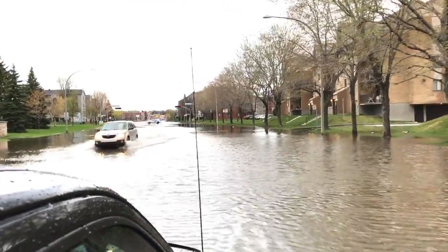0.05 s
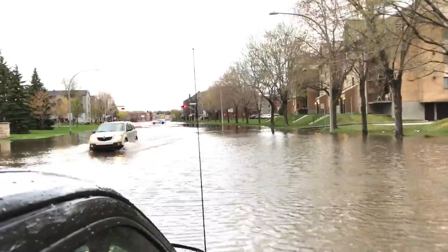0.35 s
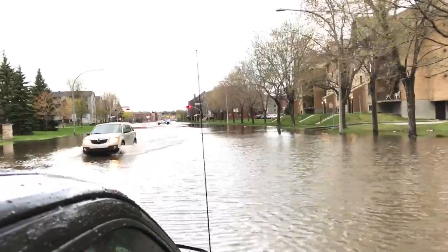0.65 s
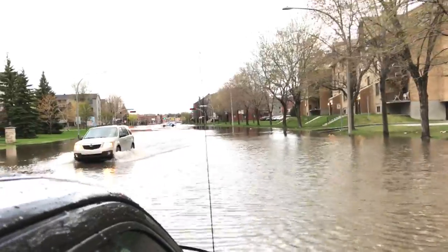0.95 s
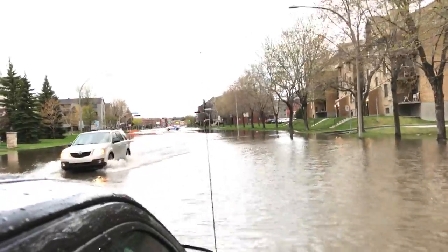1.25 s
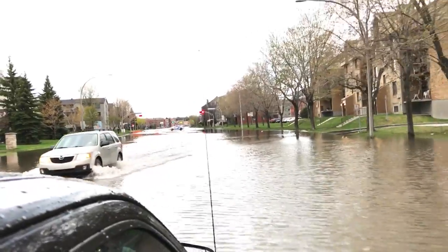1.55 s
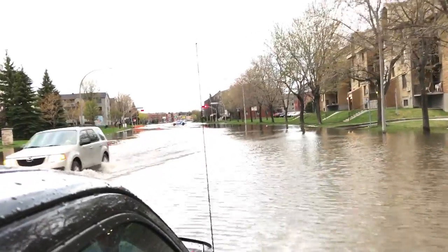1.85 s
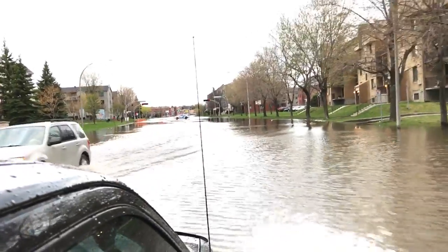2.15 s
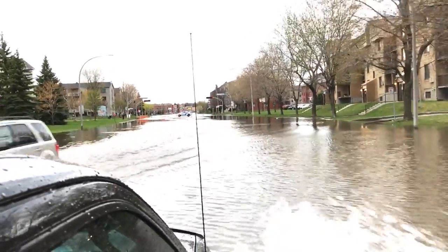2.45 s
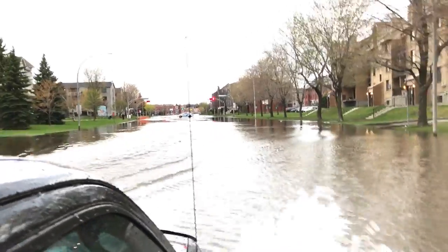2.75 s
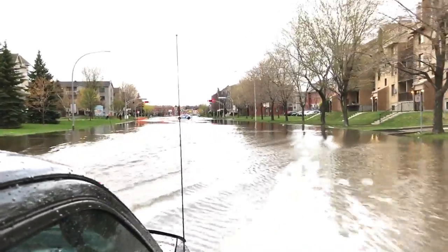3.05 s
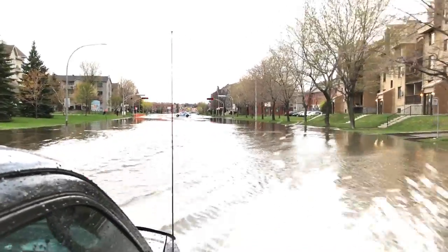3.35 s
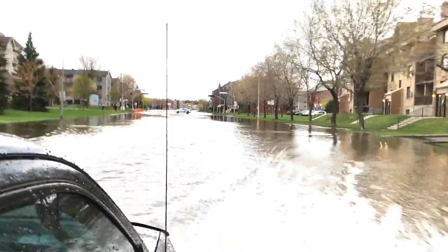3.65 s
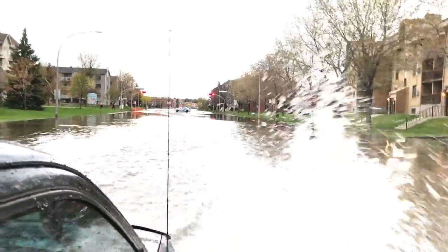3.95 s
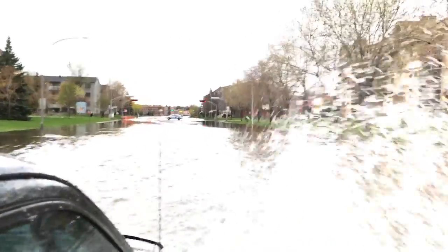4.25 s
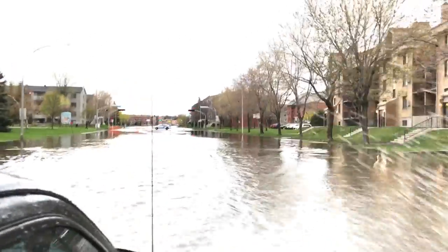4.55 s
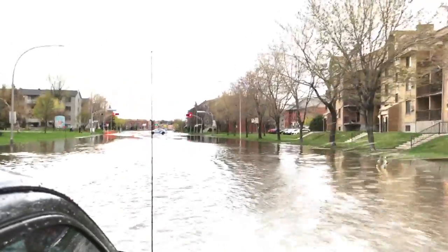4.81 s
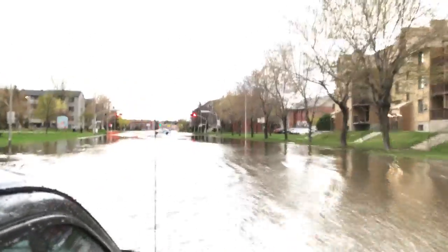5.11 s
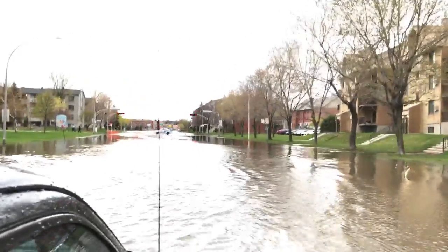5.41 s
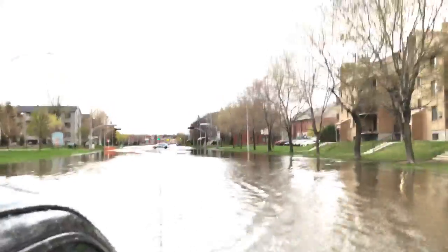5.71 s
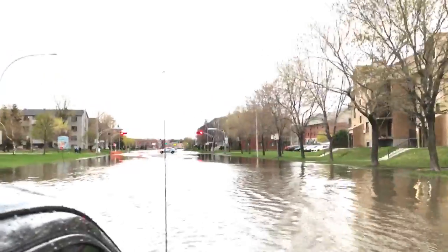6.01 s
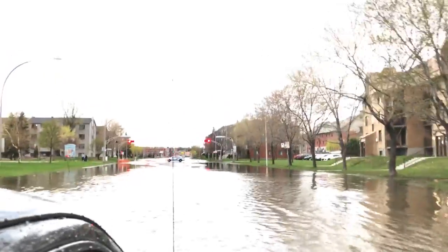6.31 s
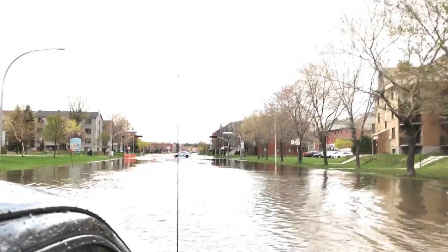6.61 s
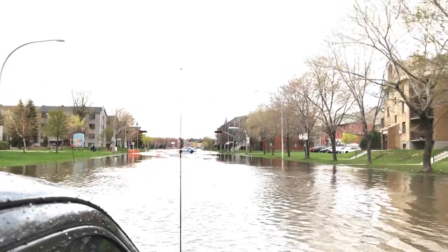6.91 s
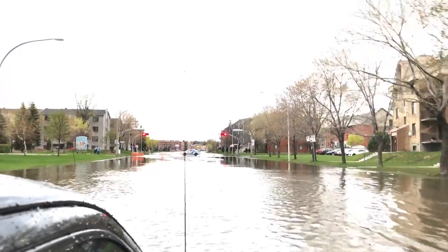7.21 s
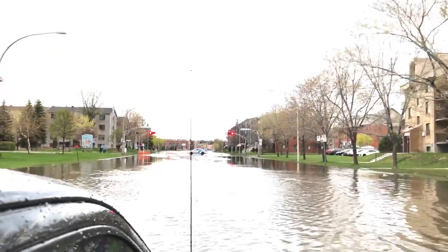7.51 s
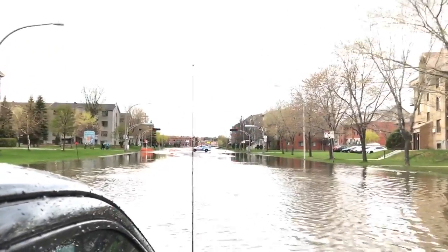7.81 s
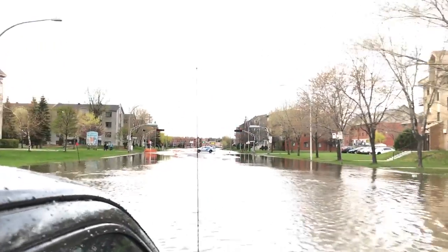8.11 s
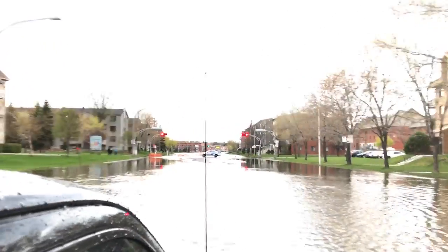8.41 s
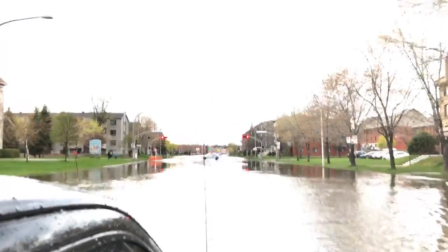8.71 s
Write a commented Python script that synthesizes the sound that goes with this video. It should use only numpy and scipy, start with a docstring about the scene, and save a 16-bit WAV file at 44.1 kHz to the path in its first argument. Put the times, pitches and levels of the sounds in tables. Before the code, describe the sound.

Water sloshes and hisses from wheels wading through a flooded street, with a passing car's low engine and gusty wind thumps.

```python
"""Wading through a flooded street

Heard from a camera held out of a vehicle's window. Close by, the bow wave churns, rushes with
bubbles and throws spray; drops plink into the water and knock on the case. Farther off, an oncoming
car revs low as it ploughs past. Wind rumbles and flaps right on the microphone, and its sharpest
eddies pop against it."""
import sys
import numpy as np
from scipy import signal
from scipy.fft import rfft, irfft, next_fast_len
from scipy.io import wavfile
from scipy.ndimage import uniform_filter1d, minimum_filter1d

SR = 44100
rng = np.random.default_rng(int(sys.argv[2]) if len(sys.argv) > 2 else 0)


def generate_wav(signal):
    """Clip the signal to [-1, 1] and save it as 16-bit WAV at the path in sys.argv[1]."""
    frames = np.transpose(np.atleast_2d(signal))
    scaled = np.clip(frames, -1, 1) * 32767
    pcm = np.round(scaled).astype(np.int16)
    wavfile.write(sys.argv[1], SR, pcm)


N = 395136
TIME = np.arange(N) / SR


# Water thrown aside by the wheels below the window, stronger once the vehicle gathers speed:
# (time [s], rush level [dB], spray level [dB])
BOW_WAVE_LEVELS = [(0, -30.5, -39), (.35, -32, -39.5), (.55, -34.5, -41), (1, -31.5, -40.5),
                   (1.45, -31.5, -40.5), (1.97, -32.5, -38.5), (2.17, -25, -33), (2.8, -26, -31.5),
                   (4.06, -25, -31), (4.6, -29.5, -33), (5.15, -31.5, -34.5), (5.4, -29.5, -37.5),
                   (5.8, -26, -34.5), (6.35, -28.5, -37), (6.75, -29, -36.5), (7.5, -26.5, -33),
                   (8.55, -28.5, -33.5), (8.96, -25.5, -31)]
# The wave piles up and breaks: (time [s], lift [dB])
WAVE_SURGES = [(1.85, 3.5), (2.2, 0), (2.63, 1.5), (5.63, 4.5), (6.12, 3), (6.5, 2.5), (6.95, 2.5),
               (7.3, 1), (7.72, 1), (8.27, 2.5), (8.76, 0.5)]

def bow_wave():
    """The wheels push up a wave close by; its churn, rush and spray all slosh together."""
    rush_db, spray_db = curves(BOW_WAVE_LEVELS)
    surge_db = sum(db * bump(s, width_s=0.11) for s, db in WAVE_SURGES)
    rush_db += surge_db
    spray_db += 0.97 * surge_db
    water = churn(rush_db) + rush(rush_db) + spray(spray_db)
    slosh = amp(0.61 * drift(rate_hz=13))
    return slosh * water


# Spectrum of the churning water: (frequency [Hz], level [dB])
CHURN_COLOUR = [(100, -5), (250, 3), (500, -3.5), (750, -1), (1000, 0), (1350, -4.5), (1900, -3),
                (3500, -28)]

def churn(rush_db):
    """Large bubbles gurgle, following the rush and swelling as the oncoming car's wave meets ours."""
    full_rush_db = -24
    meeting_db = 2.5 * bump(1.8, width_s=0.52)
    churn_db = -27.5 + 0.48 * (rush_db - full_rush_db) + meeting_db
    gurgle = patchy_noise(patch_db=3.5, patch_hz=350, patch_s=0.096)
    gurgle += amp(-14) * bubbles(per_s=300, low_hz=373, high_hz=1716, cycles=6.73, spread_db=1.5)
    return amp(churn_db) * coloured(gurgle, CHURN_COLOUR)


# Spectrum of the froth: (frequency [Hz], level [dB])
RUSH_COLOUR = [(500, -5.5), (1100, -4), (1600, -5.5), (2000, -1.5), (2370, 3), (2800, -2), (3500, -12.5),
               (4800, -30), (9000, -47)]

def rush(rush_db):
    """Small bubbles ring in the froth over an even hiss."""
    froth = patchy_noise(patch_db=0, patch_hz=800, patch_s=0.05)
    froth += amp(-7) * bubbles(per_s=1800, low_hz=1200.5, high_hz=4194, cycles=7.3, spread_db=1)
    return amp(rush_db) * coloured(froth, RUSH_COLOUR)


# Spectrum of the falling spray: (frequency [Hz], level [dB])
SPRAY_COLOUR = [(1500, -16), (2600, 9), (3300, 7.5), (4200, 2), (4850, -4), (5700, -4), (7500, -12.5),
                (9500, -20), (10500, -24.5), (11500, -23), (15500, -27)]

def spray(spray_db):
    """Fine drops fall back; their fizz is brightest while they fly close to the microphone."""
    drops = patchy_noise(patch_db=1.17, patch_hz=2000, patch_s=0.018)
    drops += amp(-10) * bubbles(per_s=2500, low_hz=2930, high_hz=12800, cycles=2.2, spread_db=4.5)
    drops = coloured(drops, SPRAY_COLOUR)
    fizz = signal.oaconvolve(drops, signal.firwin(31, 9000, pass_zero=False, fs=SR), "same")
    fizz_db = -1.4 + 2.5 * bump(4.24, width_s=1.4)
    return amp(spray_db) * (drops + (amp(fizz_db) - 1) * fizz)


def bubbles(per_s, low_hz, high_hz, cycles, spread_db, rise=0.08, sizes=28):
    """Bubbles of many sizes ring briefly, each rising in pitch as it nears the surface."""
    out = np.zeros(N)
    for hz in np.geomspace(low_hz, high_hz, sizes):
        t = np.arange(0, 6 * cycles / hz, 1 / SR)
        age = t * hz / cycles  # in decay times
        ring = np.sin(2 * np.pi * hz * t * (1 + rise * age / 2)) * np.exp(-age)
        born = np.flatnonzero(rng.random(N) < per_s / sizes / SR)
        strength = np.minimum(rng.exponential(1, N)[born], 4)
        train = np.zeros(N)
        train[born] = amp(spread_db * strength)
        out += hz * signal.oaconvolve(train, ring)[:N]
    return unit(out)


# Large drops landing close by: (time [s], level [dB], starting pitch [Hz], decay [s])
PLINKING_DROPS = [(3.37, -18, 2480, .006), (3.621, -22, 2520, .005), (3.722, -5, 2480, 0.0023)]

def plinks():
    """Each drop traps a bubble that rings and rises a little in pitch."""
    out, t = np.zeros(N), np.arange(0, 0.06, 1 / SR)
    attack = 1 - np.exp(-t / 0.00053)
    for s, db, hz, decay_s in PLINKING_DROPS:
        ring = np.sin(2 * np.pi * hz * t * (1 + 2 * t))
        add(out, s, amp(db) * ring * attack * np.exp(-t / decay_s))
    return out


# Drops that hit the camera: (time [s], peak [dB])
CASE_HITS = [(7.714, -5.5), (8.4595, 2.5)]
# Modes of its case: (frequency [Hz], relative level [dB], time to fall 60 dB [s])
CASE_MODES = [(612, 2, 0.027), (99, -12, 0.031)]

def knocks():
    """A flying drop strikes the case, which gives a short hollow ring."""
    out, t = np.zeros(N), np.arange(0, 0.06, 1 / SR)
    ring = sum(amp(db - 60 * t / t60) * np.sin(2 * np.pi * hz * t) for hz, db, t60 in CASE_MODES)
    for s, db in CASE_HITS:
        add(out, s, amp(db) * ring / abs(ring).max())
    return out


# The oncoming car's engine as it passes: (time [s], firing rate [Hz], level [dB])
ENGINE_REVS = [(0.801, 42.14, -44), (1.03, 52.25, -30), (1.2, 60.9, -20.5), (1.45, 69.15, -26),
               (1.75, 71.4, -26), (1.97, 72.4, -39), (2.15, 73.7, -28), (2.8, 81, -36), (3.1, 80, -35)]
# Its partials: (frequency [multiple of the firing rate], relative level [dB])
ENGINE_ORDERS = [(1, -3), (1.5, -23), (2, -20), (3, -19)]

def oncoming_engine():
    """The low, wavering drone of an engine pulling against the water."""
    hz, db = curves(ENGINE_REVS)
    firings = np.cumsum(hz * (1 + 0.0037 * drift(rate_hz=15))) / SR
    drone = sum(amp(level) * np.sin(2 * np.pi * order * firings) for order, level in ENGINE_ORDERS)
    start_s, end_s, fade_s = ENGINE_REVS[0][0], ENGINE_REVS[-1][0], 0.1
    fade = np.clip(np.minimum(TIME - start_s, end_s - TIME) / fade_s, 0, 1)
    return fade * amp(db + 1.9 * drift(rate_hz=15)) * unit(drone)


# Wash around the oncoming car, heard from the window: (time [s], level [dB])
WASH_LEVELS = [(0, -31), (1.5, -31.5), (2, -37), (2.3, -29.5), (2.7, -49), (8.96, -68)]
# Its spectrum, duller for the distance: (frequency [Hz], level [dB])
WASH_COLOUR = [(500, -1.5), (1200, 2.5), (1600, 5.5), (2100, 9), (2700, -13), (4000, -19), (7000, -33),
               (11000, -48)]

def oncoming_wash():
    """The oncoming car's bow wave draws near and falls behind."""
    wash_db, = curves(WASH_LEVELS)
    froth = patchy_noise(patch_db=1, patch_hz=600, patch_s=0.05)
    return amp(wash_db) * coloured(froth, WASH_COLOUR)


# Gusts on the microphone, levels before their trims:
# (centre time [s], length [s], push level [dB], flutter level [dB])
MIC_GUSTS = [(0.035, 0.037, -28, -28), (0.19, 0.044, -23.5, -32), (0.413, 0.045, -21, -22),
             (0.447, 0.052, -21.5, -21), (0.551, 0.023, -27, -24.5), (0.609, 0.035, -22.5, -26.5),
             (0.742, 0.035, -22, -30), (0.818, 0.049, -26, -29.5), (1.262, 0.1, -24.5, -27),
             (1.523, 0.099, -26, -25.5), (1.911, 0.051, -17.5, -24.5), (2.384, 0.073, -17.5, -25),
             (2.626, 0.11, -19.5, -23.5), (2.716, 0.057, -15, -16.5), (2.78, 0.027, -19.5, -21.5),
             (3.216, 0.035, -8, -25.5), (3.488, 0.082, -24, -23.5), (3.573, 0.047, -18.5, -18.5),
             (3.686, 0.042, -20, -18.5), (3.873, 0.052, -10, -20.5), (4.007, 0.02, -23, -23.5),
             (4.107, 0.1, -19.5, -20), (4.211, 0.045, -19, -16.0), (4.28, 0.032, -30, -20),
             (4.341, 0.07, -22.5, -16.0), (4.414, 0.028, -17.0, -15), (4.46, 0.024, -15.5, -11.5),
             (4.501, 0.029, -9, -9.5), (4.562, 0.077, -20, -17), (4.626, 0.026, -13, -12.5),
             (4.661, 0.02, -16, -16.5), (4.706, 0.031, -16.5, -12), (4.763, 0.069, -19, -20.5),
             (4.865, 0.039, -20, -19.5), (4.927, 0.03, -13.5, -19.5), (4.966, 0.029, -17, -18.0),
             (5.066, 0.061, -18, -17), (5.185, 0.064, -15, -18.5), (5.279, 0.082, -13, -18),
             (5.664, 0.074, -12.5, -17), (5.739, 0.034, -18, -17.5), (5.86, 0.053, -11.5, -14.5),
             (5.95, 0.022, -10.5, -29.0), (6.186, 0.074, -12, -36), (6.256, 0.023, -12.5, -19),
             (6.343, 0.04, -18, -18.5), (6.44, 0.045, -20, -28), (6.536, 0.083, -16, -21),
             (6.667, 0.05, -23.5, -32), (6.803, 0.049, -21.5, -21), (7.028, 0.12, -25, -25),
             (7.312, 0.07, -18.5, -37), (7.918, 0.046, -19.5, -27.5), (8.009, 0.019, -22, -24.0),
             (8.665, 0.03, -24, -32)]

def gusts():
    """Each gust is a ragged flutter with a low push just behind it; returns (pushes, flutters)."""
    push_lag_s, push_trim_db, flutter_trim_db = 0.00502, 0.5, 3
    pushes, flutters, pressure = np.zeros(N), np.zeros(N), air_pressure()
    turbulence = rng.standard_normal(N) * amp(6 * drift(rate_hz=126))
    turbulence = butter(steady(turbulence, window_s=0.0298), 91.5, "high")
    for s, length, push_db, flutter_db in MIC_GUSTS:
        near = abs(TIME - s) < length
        edge_hz = 242 * 2 ** ((flutter_db - push_db) / 7.5)  # brighter as flutter outweighs push
        flutter = butter(turbulence[near], 0.34 * edge_hz, "low", order=1)
        flutter = butter(flutter, 2.63 * edge_hz, "low", order=3)
        add(flutters, s - length, amp(flutter_db + flutter_trim_db) * burst(flutter, length))
        add(pushes, s - length + push_lag_s, amp(push_db + push_trim_db) * burst(pressure[near], length))
    return pushes, flutters


# Single eddies that hit the microphone port: (time [s], swing peak [dB], slowing [per cycle])
PORT_EDDIES = [(.405, -9.5, 0.8), (0.456, -8.5, 0.82), (.813, -10.5, 0.53), (1.8943, 1, 1.13),
               (2.693, -6.5, 0.65), (2.73, -10, 0.75), (3.212, -3, 0.93), (3.864, -8, 0.4),
               (3.992, -8, 0.49), (4.191, -8, 0.49), (4.21, -7, 0.55), (4.316, -7.5, 0.34),
               (4.329, -1.5, 0.48), (4.437, -4.5, 0.55), (4.534, -10, 0.25), (4.568, -6, .55),
               (4.628, -2.5, 0.58), (4.687, -7.5, 0.44), (4.702, -1.5, 0.42), (4.925, -9.5, .65),
               (4.961, -9, 0.4), (5.173, -6, 0.99), (5.254, -3.5, 0.51), (5.852, -5.5, 0.44),
               (6.333, -9.5, .9), (6.523, -3, 1.07), (6.55, -4, 1.74), (7.035, -10, 1.17),
               (7.7127, -13, 1.23), (8.4577, -0.5, 1.44)]

def eddies():
    """An eddy's pressure swing starts fast and slows within a few cycles: a dull pop, ragged tail."""
    out, t = np.zeros(N), np.arange(0, 0.05, 1 / SR)
    for s, db, slowing in PORT_EDDIES:
        start_hz = 1790 * 2 ** (db / 8.5)  # weaker eddies start lower
        decay_s = 0.008 * slowing ** 0.98  # one that slows more lasts longer
        tail_gain = amp(-16) / slowing ** 1.16  # and is rounder
        cycles = np.log(1 + slowing * start_hz * t) / slowing
        attack = 1 - np.exp(-cycles / 0.19)
        swing = np.sin(2 * np.pi * cycles) * attack * np.exp(-t / decay_s)
        ragged_air = unit(butter(rng.standard_normal(len(t)), 0.79 * start_hz, "low", order=4))
        tail = ragged_air * attack * np.exp(-t / 0.0082)
        add(out, s, amp(db) * (swing / abs(swing).max() + tail_gain * tail))
    return out


# Peaks and dips of the microphone port: (frequency [Hz], width [Hz], gain [dB])
PORT_BANDS = [(133, 36, 2), (340, 110, -2), (597, 88, -1)]

def mic_port(x):
    """The small cavity in front of the microphone makes gusts sound hollow."""
    for hz, width, db in PORT_BANDS:
        band = signal.lfilter(*signal.iirpeak(hz, hz / width, fs=SR), x)
        x = x + (amp(db) - 1) * band
    return x


# Thin ticks that come with a few of the eddies: (time [s], peak [dB], upper edge [Hz])
EDDY_TICKS = [(5.254, -5.5, 15000), (7.7185, -11.5, 7000), (8.4613, -4.5, 11000), (8.472, -6, 15000),
              (8.4832, -19, 9000)]
# Their spectrum: (frequency [Hz], level [dB])
TICK_COLOUR = [(500, -17), (1500, -17), (3500, 7), (5500, 2), (8500, -9), (12500, -22), (15500, -27)]

def ticks():
    """Sub-millisecond crackles right at the microphone."""
    out, size = np.zeros(N), 256
    snap = coloured(signal.unit_impulse(size, "mid"), TICK_COLOUR)
    for s, db, edge_hz in EDDY_TICKS:
        tick = butter(snap, edge_hz, "low")
        add(out, s - size / 2 / SR, amp(db) * tick / abs(tick).max())
    return out


# Air streaming over the microphone outside the window: (time [s], level [dB])
AIR_STREAM = [(0, -32), (.7, -36), (1.05, -30.5), (1.55, -25.5), (2, -29.5), (2.6, -26.5), (3.35, -24.5),
              (4.3, -25.5), (5.2, -21.5), (5.45, -25.5), (6.1, -19.5), (6.65, -26.5), (6.9, -29.5),
              (7.8, -29), (8.3, -38.5), (8.96, -34)]

def wind_rumble():
    """The air stream rumbles, in small random puffs."""
    air_db, = curves(AIR_STREAM)
    puffs_db = 3 * drift(rate_hz=22)
    return amp(air_db + puffs_db) * air_pressure()


# Spectrum of wind on the microphone: (frequency [Hz], level [dB])
WIND_COLOUR = [(20, -34), (35, -8.5), (50, 3), (80, 2), (130, -5), (250, -19), (500, -26), (1200, -58)]

def air_pressure():
    """Low pressure noise of moving air, rms 1."""
    return steady(coloured(rng.standard_normal(N), WIND_COLOUR), window_s=0.071)


def patchy_noise(patch_db, patch_hz, patch_s, size=512):
    """Noise that swells in small patches of time and pitch, like clouds of bubbles."""
    hz, t, spectrum = signal.stft(rng.standard_normal(N), SR, nperseg=size)
    across, along = np.fft.fftfreq(len(hz), hz[1])[:, None], np.fft.rfftfreq(len(t), t[1])
    blur = np.exp(-(across * patch_hz) ** 2 - (along * patch_s) ** 2)
    speckle = rng.standard_normal(spectrum.shape)
    patches = unit(np.fft.irfft2(np.fft.rfft2(speckle) * blur, spectrum.shape))
    _, noise = signal.istft(spectrum * amp(patch_db * patches), SR, nperseg=size)
    return unit(noise[:N])


def drift(rate_hz):
    """Random wavering, mostly slower than rate_hz; rms 1."""
    f = np.fft.rfftfreq(N, 1 / SR)
    return unit(irfft(rfft(rng.standard_normal(N)) / (1 + (f / rate_hz) ** 4), N))


def steady(x, window_s):
    """Evens out the slow swings of a noise and keeps its fast flutter."""
    power = uniform_filter1d(x ** 2, max(int(window_s * SR), 1))
    return unit(x / np.sqrt(abs(power) + 1e-9))


def burst(noise, length_s):
    """Shapes noise into a burst that starts and stops abruptly, rms 1 at its height."""
    t = (np.arange(len(noise)) - len(noise) / 2) / SR
    swell = np.exp(-abs(t / (0.52 * length_s)) ** 4)
    return unit(swell * noise) * np.sqrt(np.mean(swell ** 2))


def coloured(x, colour):
    """Filters by a spectrum on a log-frequency axis, rolling off above its last point; rms 1."""
    hz, db = np.transpose(colour)
    size = next_fast_len(len(x))
    f = np.fft.rfftfreq(size, 1 / SR)
    gain = amp(np.interp(np.log(f + 1), np.log(hz), db)) / np.maximum(f / hz[-1], 1) ** 2
    return unit(irfft(rfft(x, size) * gain, size)[:len(x)])


def butter(x, hz, kind, order=2):
    """A smooth low-pass or high-pass."""
    return signal.sosfilt(signal.butter(order, min(hz, SR / 2 - 1), kind, fs=SR, output="sos"), x)


def bump(centre_s, width_s):
    """A smooth rise and fall of height 1."""
    return np.exp(-((TIME - centre_s) / width_s) ** 2)


def curves(rows):
    """Each column of a table, joined by straight lines in time."""
    s, *columns = np.transpose(rows)
    return [np.interp(TIME, s, column) for column in columns]


def add(mix, s, sound):
    """Lays a sound into the mix at a time."""
    part = mix[max(round(s * SR), 0):][:len(sound)]
    part += sound[:len(part)]


def amp(db):
    """Decibels to gain."""
    return 10 ** (np.asarray(db) / 20)


def unit(x):
    """Scales to rms 1."""
    return x / np.sqrt(np.mean(x ** 2) + 1e-20)


def scene():
    """Water, engine and wind at one microphone outside the window."""
    flood = bow_wave() + oncoming_wash() + plinks() + knocks()
    pushes, flutters = gusts()
    wind = wind_rumble() + pushes + mic_port(flutters + eddies()) + ticks()
    return (flood + oncoming_engine() + wind)[None]


def record(dry):
    """The camera cuts the bass, quickly limits the hardest peaks and trims the top of the band."""
    ceiling_db, recovery_db_per_s, edge_hz = -0.32, 160, 15750
    x = butter(dry[0], 32, "high", order=4)
    over_db = np.maximum(20 * np.log10(abs(x) + 1e-9) - ceiling_db, 0)
    recovery_db = TIME * recovery_db_per_s
    duck_db = np.maximum.accumulate(over_db + recovery_db) - recovery_db
    gain = minimum_filter1d(amp(-duck_db), size=97)  # ducks just ahead of each peak
    gain = uniform_filter1d(uniform_filter1d(gain, size=49), size=49)
    band_limit = signal.firwin(511, edge_hz, window=("kaiser", 9), fs=SR)
    return signal.oaconvolve(x * gain, band_limit, "same")[None]


dry = scene()
out = record(dry)
generate_wav(out)
```